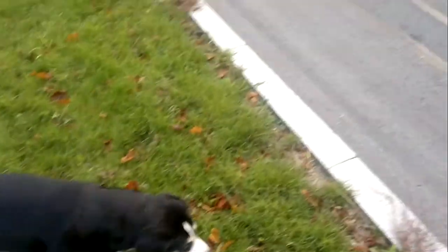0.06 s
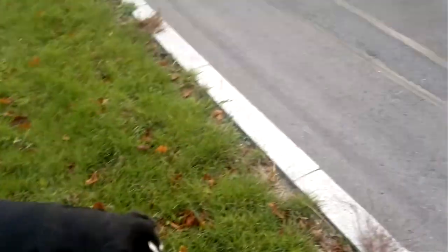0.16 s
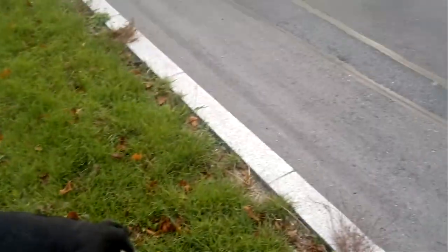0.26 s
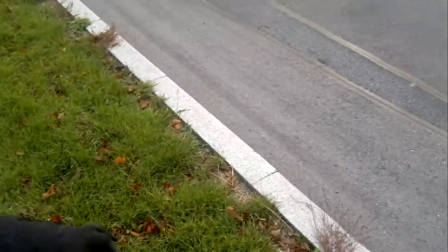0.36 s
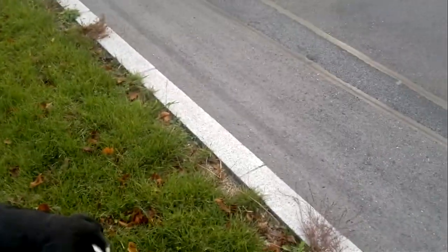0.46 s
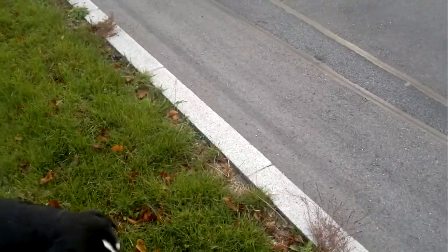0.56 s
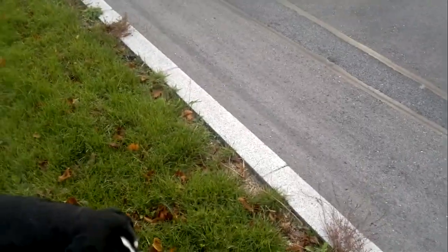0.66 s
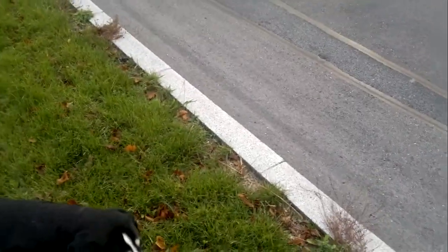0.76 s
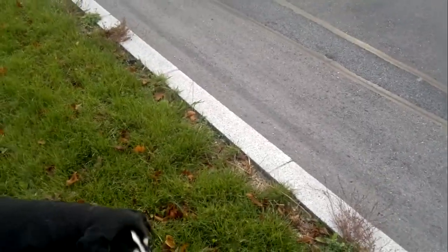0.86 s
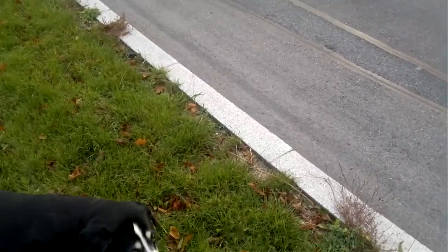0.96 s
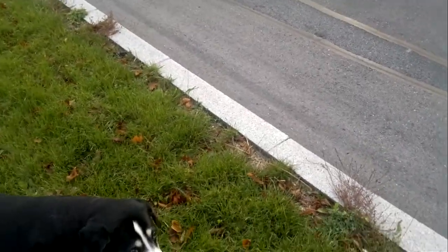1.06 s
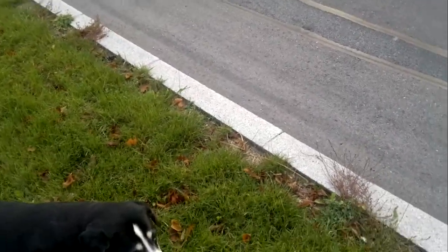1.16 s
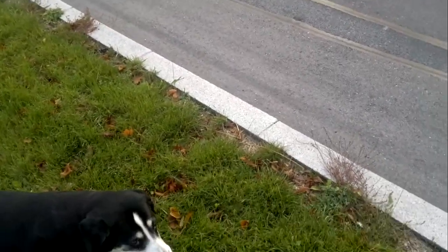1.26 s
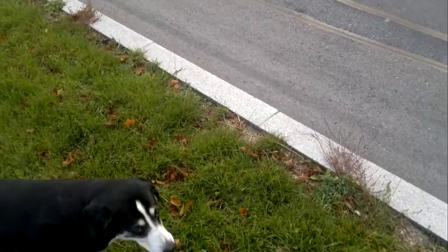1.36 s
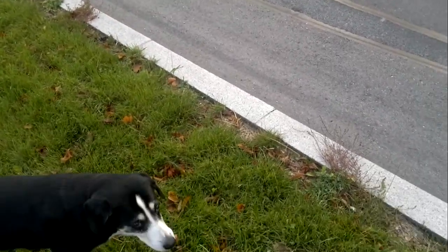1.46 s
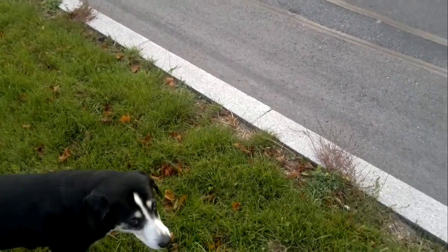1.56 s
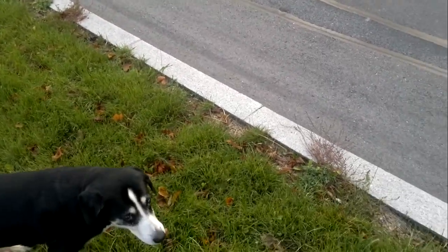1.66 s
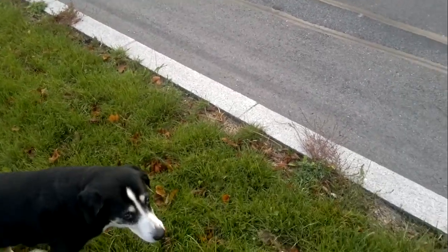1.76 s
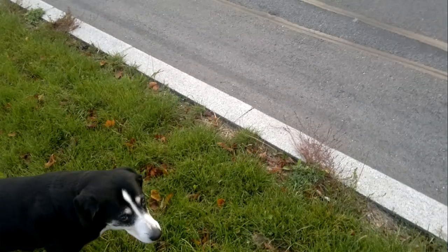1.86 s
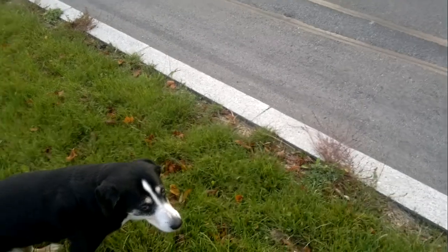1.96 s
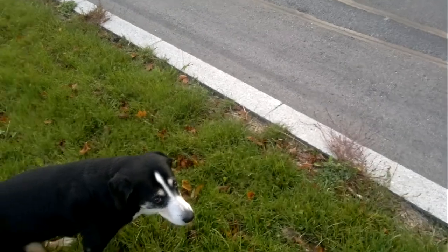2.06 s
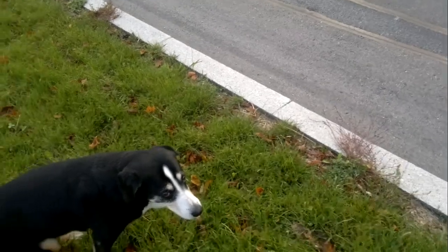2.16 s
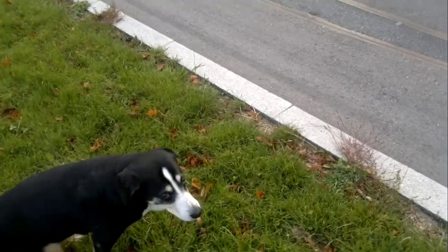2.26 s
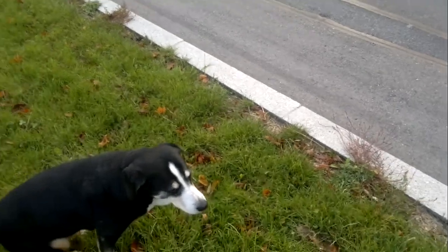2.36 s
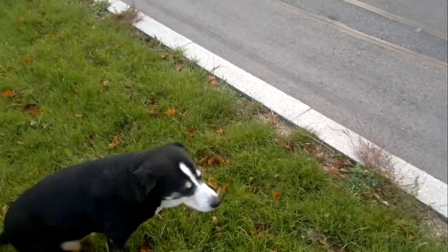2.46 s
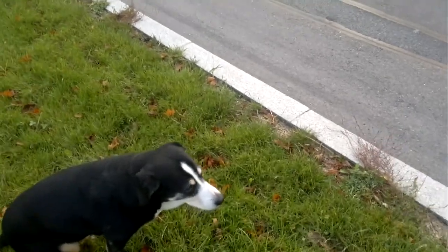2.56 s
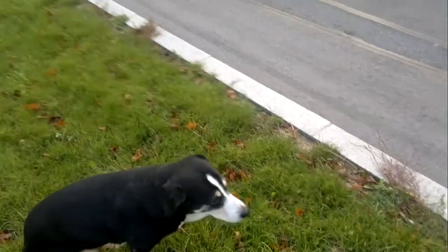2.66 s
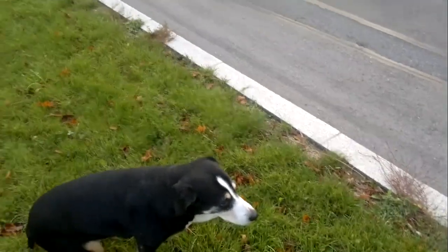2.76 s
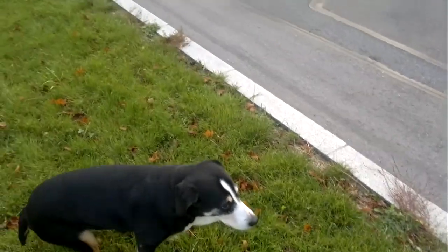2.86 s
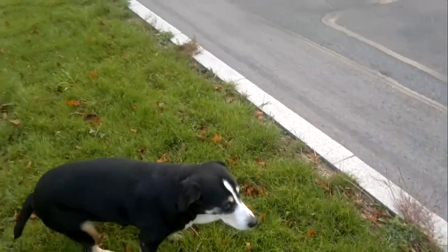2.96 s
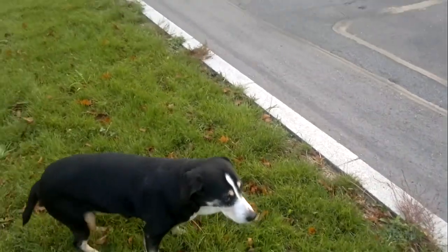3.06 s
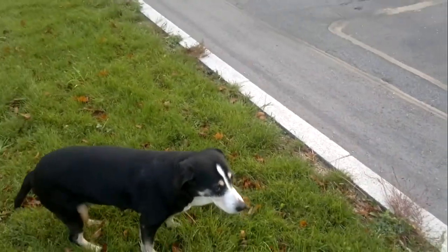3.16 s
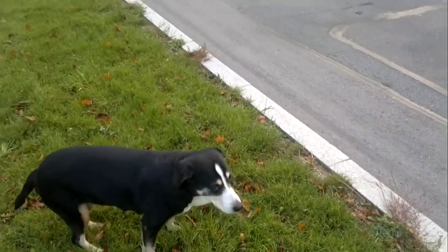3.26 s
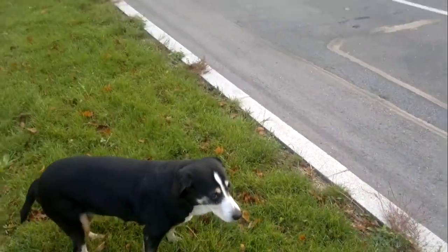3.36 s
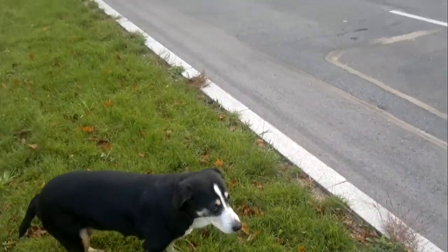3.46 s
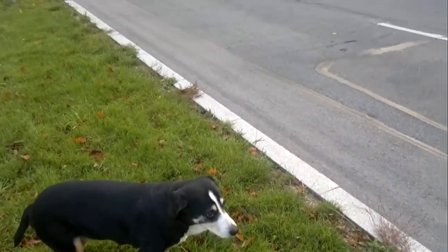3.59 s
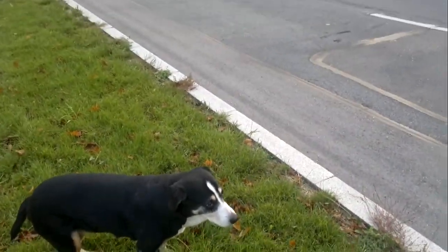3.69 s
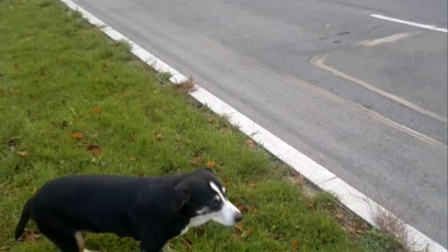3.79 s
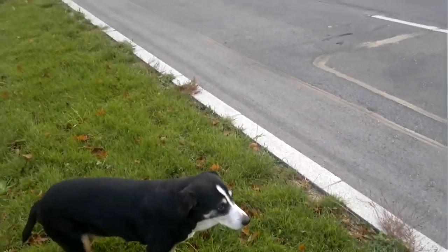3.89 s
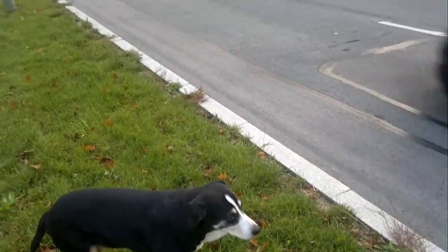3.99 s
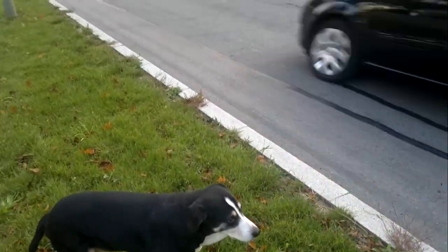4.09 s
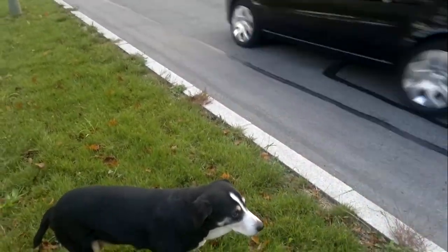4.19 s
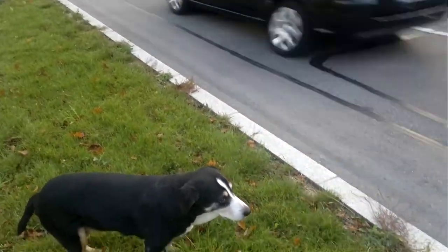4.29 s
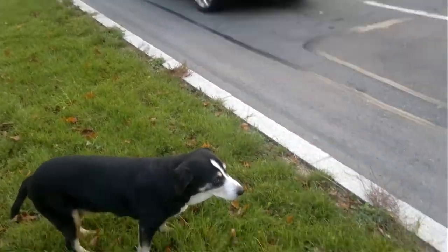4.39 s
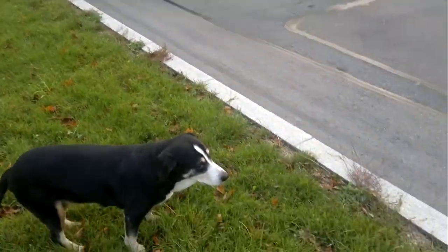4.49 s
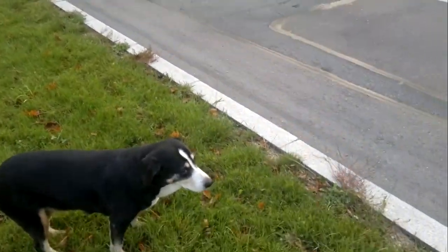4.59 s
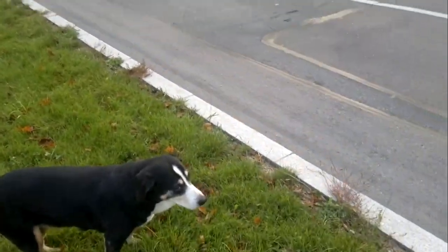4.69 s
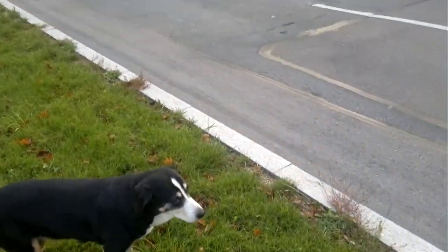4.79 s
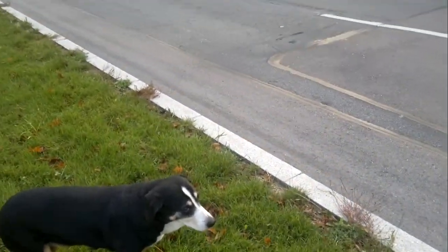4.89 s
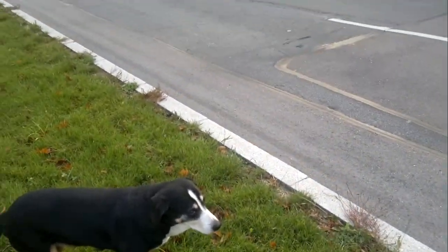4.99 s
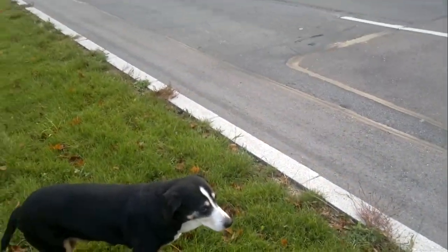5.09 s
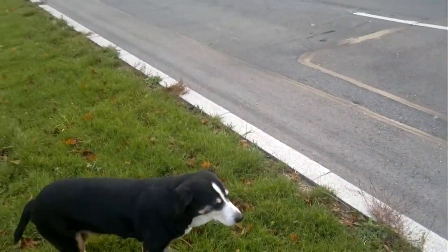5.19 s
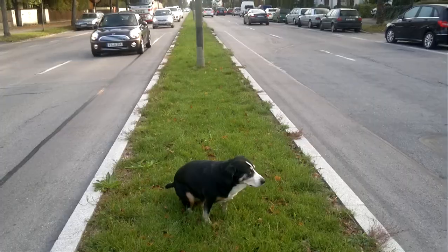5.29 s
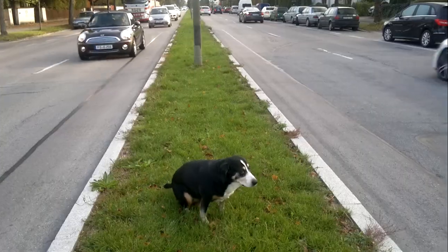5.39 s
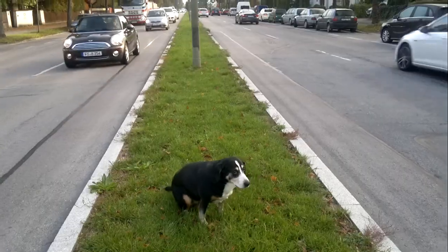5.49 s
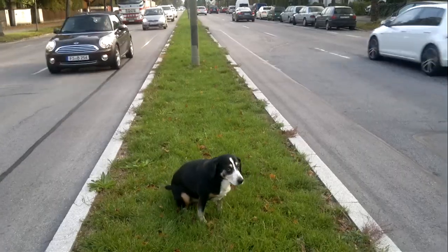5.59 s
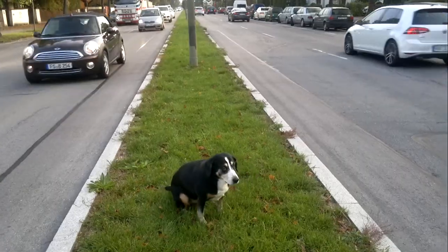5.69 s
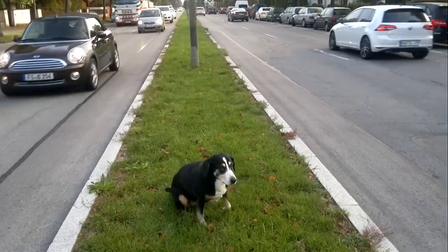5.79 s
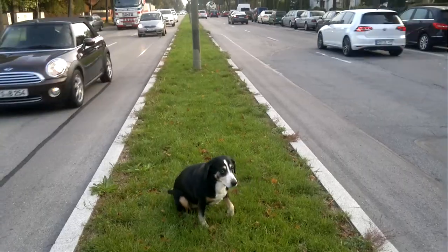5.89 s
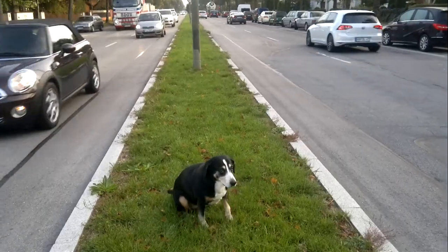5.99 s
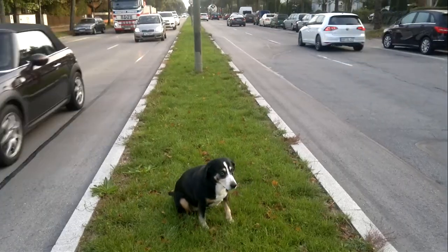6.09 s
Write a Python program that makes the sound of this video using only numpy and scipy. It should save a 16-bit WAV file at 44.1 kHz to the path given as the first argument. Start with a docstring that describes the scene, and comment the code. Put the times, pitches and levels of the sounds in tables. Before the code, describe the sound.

Muffled road hush with handling knocks swells into a close car pass, drops to silence for an instant, then returns abruptly with passing tyres and thuds.

```python
"""Multi-lane street traffic, heard from the grass strip through a hand-held camera with a half-covered right port.
Far traffic murmurs as banded noise from the start; soon skin rustles on the case and engine notes glide.
From about one second fingers bump (short bell-shaped pushes) and nails tick (ringing case modes).
Loud cars swell and pass around four seconds, as noise layers that follow each car's distance.
At 5.35 s the sound drops out for a fifth of a second; other cars then pass and thud over a road joint."""
import sys
import numpy as np
from scipy import signal
from scipy.fft import rfft, irfft, next_fast_len
from scipy.io import wavfile
from scipy.ndimage import uniform_filter1d, map_coordinates

SR = 44100
rng = np.random.default_rng(int(sys.argv[2]) if len(sys.argv) > 2 else 0)


def inscribe(sig):
    """Save sig as 16-bit PCM at rate SR to the path in sys.argv[1].

    A 1-D sig is mono; a 2-D sig holds one channel per row.
    Samples are clipped to [-1, 1] before scaling.
    """
    pcm = np.round(np.clip(np.atleast_2d(sig).T, -1, 1) * 32767)
    wavfile.write(sys.argv[1], SR, pcm.astype(np.int16))


def decibels_to_gain(level_db):
    """Convert a level in decibels to a linear amplitude gain (20 dB per decade)."""
    exponent = np.asarray(level_db, float) / 20
    return 10 ** exponent


N = 271151
OUT_S, IN_S = 5.3495, 5.572  # the sound drops out, and starts to fade back in [s]

# All source levels are set ahead of the final gain.
# noise colours of the tyre layers, low to high: (frequency [Hz], relative level [dB])
RUMBLE_COLOUR = [(15, -41.5), (25, -17), (40, 0), (80, -0.5), (100, -6), (130, -6.5), (217, -7.5),
                 (288, -10), (420, -18), (550, -16), (900, -86.5)]
DRONE_COLOUR = [(250, -35.5), (400, -5.5), (530, 6), (680, 1.5), (820, -2), (1100, -43)]
ROAR_COLOUR = [(450, -13), (760, -5.5), (900, 0.5), (1050, 1.5), (1250, 1), (1450, -3.5), (1700, -11),
               (2200, -56.5)]
PUMP_COLOUR = [(1100, -38), (1450, -1), (1700, 1), (2000, 2), (2250, -0.5), (2550, -7), (3200, -50)]
HISS_COLOUR = [(1400, -44.5), (2400, -14.5), (2600, -0.5), (3050, 2), (3600, -1), (4500, -13), (5400, -22),
               (5900, -45.5), (7000, -67.5)]
FIZZ_COLOUR = [(2900, -29), (3500, 1), (4200, -2.5), (5000, -9), (5800, -15.5), (6600, -26), (7400, -45)]
SIZZLE_COLOUR = [(4500, -27), (5600, 2), (6400, -5.5), (7400, -11), (8800, -16.5), (10800, -24.5),
                 (13000, -30.5), (15300, -30.5), (15900, -69)]
# single cars, the nearest given axle by axle:
# (closest [s], level [dB], approach [s], departure [s], lane loss before each layer's share [dB])
CAR_PASSES = [(-0.7458, -13, 0.46, .55, 0), (4.16, -.6, 0.47, 0.2, 0.69), (4.33, -4, .12, .2, 1.5),
              (4.97, -10, 0.25, 1.2, 2.5), (5.66, -1.5, .3, .2, 5), (6.02, -3.5, .25, .6, 6)]
# the 400-800 Hz drone of the passing cars:
# (closest [s], level [dB], approach [s], departure [s], lane loss before each layer's share [dB])
DRONE_PASSES = [(2.75, -10, 1.24, .5, 0), (3.85, 0.27, 0.563, 0.2, 0), (5.28, -4, .3, .5, 0),
                (5.62, -6, .3, .45, 0)]
# tyres in line of sight, which feed the two top layers:
# (closest [s], level [dB], approach [s], departure [s], lane loss before each layer's share [dB])
SEEN_PASSES = [(3.88, -11, .06, .1, -5), (4.08, -1, .16, 0.27, 0.5), (5.05, -11.5, 0.66, 1.2, 1.72),
               (5.6, -6.5, .3, 0.4, 7), (6.15, -11, .2, .3, 3)]
# rumble, drone, roar, pump, hiss, fizz, sizzle: (far traffic [dB], near car reference [dB],
# steepness of the fall with distance [dB per dB], lead ahead of the car [s], share of the lane loss [ratio])
LAYER_MIX = [(-35.5, -28.5, 2.06, 0.1, -1.132), (-55, -31, 1.925, -0.019, 0),
             (-40.5, -23, 1.308, 0.06, -0.251), (-39.5, -25.5, 1.536, 0.02, -0.3),
             (-44, -22, 2.333, 0.026, 1), (-78.5, -29.5, 4.2, -0.0081, .1), (-79.5, -44, 2.564, .02, 1.2)]
# colour of distant traffic: (frequency [Hz], level [dB])
FAR_COLOUR = [(330, 0), (450, -6), (620, -5), (850, -4.5), (1100, -3.5), (1450, -3), (2050, 0.7),
              (2600, -1), (3150, 2), (3600, -3.5), (4200, 2.39), (5000, 5), (5900, .5)]
# strongest ridge, drifting as the distant cars move: (time [s], frequency [Hz])
RIDGE_DRIFT = [(0, 1134), (.6, 1045), (1.05, 1240), (1.45, 1300), (1.85, 1160), (2.15, 1327), (2.6, 1220),
               (6.15, 1146)]
# near car heard once more off the road: (time [s], ridge spacing [Hz], depth before the roll-off [dB])
ROAD_BOUNCE = [(3.3, 1100, 0), (3.7, 1050, 1.5), (4.1, 1200, 2), (4.45, 1320, 3), (4.8, 1300, 1),
               (5.3, 900, 1), (5.58, 1030, 3), (6.15, 980, 3)]
# the hand slides on the right port: (time [s], bass loss [dB])
HAND_COVER = [(0, 32.5), (1.3, 28), (2.3, 21.5), (2.9, 17.5), (3.03, 14), (3.5, 14.5), (4.1, 11),
              (4.8, 16.5), (5.1, 11.5), (6.15, 11)]
# one column: (bass ends, middle begins, middle ends, treble begins [Hz])
COVER_SPLITS = [430, 1000, 2300, 3000]
# the loudest car moves along the street: (time [s], how late the left port hears it [ms])
PORT_LAG = [(0, 0.055), (1.3, -0.153), (1.6, 0.22), (3.6, 0.21), (4.1, 0.272), (4.6, -0.307),
            (5.35, 0.0085), (5.6, -0.184), (6.15, -0.16)]
# (frequency [Hz], likeness of the left and right street sound [0 to 1])
PORT_LIKENESS = [(60, .95), (350, .94), (700, .92), (1100, .75), (2000, .72), (3000, .45), (4500, .15)]
# treble band coming and going in the right port: (time [s], from [Hz], to [Hz], loss [dB])
TREBLE_OPENING = [(0, 2400, 5300, 47), (3.3, 2400, 5290, 39.5), (3.47, 2500, 5196, 18),
                  (3.6, 2450, 5390, 12.5), (3.92, 2450, 5500, 15), (3.98, 2300, 7960, 20),
                  (4.15, 2300, 8000, 21.5), (4.3, 2300, 8000, 18.5), (4.38, 3400, 5400, 16),
                  (4.55, 3600, 4570, 12.5), (4.76, 3600, 4300, 34), (4.83, 2500, 4480, 25.5),
                  (5.1, 2400, 4610, 20), (5.2, 2400, 5400, 20.5), (5.35, 2400, 5400, 15),
                  (5.6, 2400, 5400, 21), (6.15, 2400, 5520, 16.5)]
# skin brushing the case: (time [s], level before grain [dB], half-width of the stroke [s])
SKIN_BRUSHES = [(0.265, -78, 0.042), (2.069, -74.5, 0.22), (2.347, -67.5, 0.0285), (2.528, -71, 0.0395),
                (2.791, -73.5, 0.038), (2.988, -63.5, 0.0205), (3.031, -68, 0.0153)]
# colour of skin on plastic: (frequency [Hz], relative level [dB])
SKIN_COLOUR = [(3000, -28.5), (5000, -2.5), (8000, -8), (12000, -12.5), (13500, -33)]
# (start [s], length [s], first pitch [Hz], last pitch [Hz], level before overtone balance [dB])
ENGINE_NOTES = [(.5, .55, 270, 240, -40), (2.75, 0.7416, 243.5, 239, -33.5), (4.4, 1.1, 232, 205, -36.5),
                (3.25, 1.2, 77, 73.5, -30.5), (4.55, 0.84, 84, 99, -34), (4.99, 0.45, 90, 75, -23.5),
                (4.08, .22, 215, 206, -24.5), (5.52, .65, 80, 70, -23), (5.52, .7, 200, 188, -28.5),
                (5.55, .65, 310, 295, -33)]
# balance within an engine note: (multiple of the pitch, level [dB])
ENGINE_OVERTONES = [(1, -4.5), (2, -12.5), (3, -23)]
# finger bumps on the case: (time [s], level [dB], frequency [Hz], length [cycles], push +1 or pull -1)
FINGER_BUMPS = [(1.135, -27.5, 203.6, 4.3, 1), (1.788, -23.5, 150, 0.61, 1), (2.3275, -11, 109.7, 1.24, 1),
                (2.3384, -13, 220, 0.756, 1), (2.345, -8, 117.8, 1.2, -1), (2.3508, -17, 299, 0.91, 1),
                (2.38, -25, 70, 3.5, 1), (2.409, -16, 115, 0.72, -1), (2.4138, -19, 130, 0.65, 1),
                (2.507, -19, 219, 0.92, 1), (2.516, -21.5, 111, 1.15, 1), (2.587, -12.5, 130, 0.825, -1),
                (2.592, -21.5, 110, 0.68, 1), (2.6326, -15, 600, 0.68, 1), (2.6345, -16.5, 250, .8, -1),
                (2.6447, -21, 69.7, 1.26, 1), (2.862, -21, 90, 1.34, 1), (3.273, -21.5, 120, 0.63, -1),
                (3.376, -24, 90, 0.99, 1)]
# fingernail ticks: (time [s], level [dB], sharpness added above 6 kHz [dB],
# edge added above 4.2 and up to 6 kHz [dB], body added below 2.5 kHz [dB])
NAIL_TICKS = [(2.3206, -32, -12.5, 0, 3), (2.3406, -29, -3.5, 0, 4), (2.3486, -26, -5.5, 0, 2),
              (2.6307, -14.5, 6, -5, 3), (2.9834, -27, 8, -1, 0), (3.0265, -25, 3, 4, -3),
              (3.1167, -19, -14, 2, 4), (3.3916, -24, -5, 1, -1.5), (5.7462, -24, -12, 5, 0)]
# ringing modes of the plastic case: (frequency [Hz], level before tick colour [dB], 60 dB decay [s])
CASE_MODES = [(1500, -6, 0.005), (2100, -6, 0.004), (3050, 3.5, 0.0045), (3700, -5, 0.0035),
              (4680, -2.5, 0.0035), (5500, -12, .003), (6900, -26, 0.003), (8600, -31, .003),
              (10300, -30, 0.003), (11700, -33, .003), (13500, -42, .003)]
# suspensions over a road joint: (time [s], level [dB], frequency [Hz], length [cycles], push +1 or pull -1)
JOINT_THUDS = [(5.609, -11, 80, .8, -1), (5.667, -11, 1100, 2.2, 1), (5.69, -12, 90, .8, -1),
               (5.826, -14, 90, .8, -1), (5.832, -15, 90, .8, 1)]


def unit(x):
    """Scaled to rms 1."""
    return x / np.sqrt(np.mean(x ** 2) + 1e-20)


def along(points, hz):
    """(Hz, value) points read on a log frequency axis."""
    f, v = np.transpose(points)
    return np.interp(np.log(hz + 1), np.log(f + 1), v)


def curves(rows, t=np.arange(N) / SR):
    """Each column after the time, read at times t."""
    s, *cols = np.transpose(rows)
    return [np.interp(t, s, c) for c in cols]


def wobble(rate):
    """A smooth random curve with rate knots a second."""
    knots = rng.standard_normal(int(N * rate / SR) + 4)
    return map_coordinates(knots, [np.arange(N) * rate / SR])


def rush(spectrum, patchy_db):
    """Two unrelated coloured noises, jointly of rms 1, sharing time-frequency patches of random gain."""
    z = signal.stft(rng.standard_normal((2, N)), nperseg=1024)[2]
    field = rng.standard_normal(z.shape[1:])
    field = uniform_filter1d(uniform_filter1d(field, size=8, axis=0), size=8, axis=1)
    patchy = signal.istft(z * decibels_to_gain(patchy_db * unit(field)), nperseg=1024)[1]
    size = next_fast_len(N + SR)
    hz = np.fft.rfftfreq(size, 1 / SR)
    inside = (hz > spectrum[0][0]) * (hz < spectrum[-1][0])
    colour = decibels_to_gain(along(spectrum, hz)) * inside
    return unit(irfft(rfft(patchy, size) * colour, size)[:, :N])


def passing(cars, far_db, near_db, steep, ahead_s, lane_share):
    """Layer gain: far traffic plus cars fading with distance, each kept to its side of the drop-out's end."""
    t = np.arange(N) / SR
    power = decibels_to_gain(2 * far_db)
    for s, db, come_s, go_s, lane_db in cars:
        u = t - s + ahead_s
        distance_db = 10 * np.log10(1 + (u / np.where(u < 0, come_s, go_s)) ** 2)
        level_db = near_db + db - lane_share * lane_db - steep * distance_db
        same_side = (t < IN_S) == (s < IN_S)
        power = power + same_side * decibels_to_gain(2 * level_db)
    return np.sqrt(power)


def tyres():
    """Exhausts rumble; treads drone, roar in the horn between tyre and road, pump air, hiss, fizz and sizzle."""
    fleets = [CAR_PASSES, DRONE_PASSES, CAR_PASSES, CAR_PASSES, CAR_PASSES, SEEN_PASSES, SEEN_PASSES]
    gains = [passing(cars, *row) for cars, row in zip(fleets, LAYER_MIX)]
    rumble, drone, roar, pump, hiss, fizz, sizzle = gains
    flutter = wobble(9)  # uneven asphalt shakes the five bands from drone to fizz together
    rumble = rumble * decibels_to_gain(0.37 * wobble(13) + 0.9 * wobble(2.8)) * rush(RUMBLE_COLOUR, patchy_db=1.5)
    drone = drone * decibels_to_gain(0.6 * flutter + wobble(3)) * rush(DRONE_COLOUR, patchy_db=1.5)
    roar = roar * decibels_to_gain(0.33 * flutter + 0.65 * wobble(3.092)) * rush(ROAR_COLOUR, patchy_db=1.06)
    pump = pump * decibels_to_gain(0.17 * flutter) * rush(PUMP_COLOUR, patchy_db=0.88)
    hiss = hiss * decibels_to_gain(0.35 * flutter) * rush(HISS_COLOUR, patchy_db=1.29)
    fizz = fizz * decibels_to_gain(0.44 * flutter) * rush(FIZZ_COLOUR, patchy_db=1.64)
    sizzle = sizzle * decibels_to_gain(wobble(12)) * rush(SIZZLE_COLOUR, patchy_db=1.5)
    return rumble + drone + roar + pump + hiss + fizz + sizzle


def road_reflection(x):
    """Reflection carves a fixed colour with a drifting ridge into far traffic, a moving comb into near cars."""
    roar_row = LAYER_MIX[2]
    far_share = (decibels_to_gain(roar_row[0]) / passing(CAR_PASSES, *roar_row)) ** 2.23
    hz, t, z = signal.stft(x, SR, nperseg=1024)
    hz = hz[:, None]
    octaves_off = np.log2((hz + 1) / curves(RIDGE_DRIFT, t)[0])
    ridge_db = 6.5 * np.exp(-(octaves_off / 0.16) ** 2)
    far_db = along(FAR_COLOUR, hz) + ridge_db
    spacing_hz, depth_db = curves(ROAD_BOUNCE, t)
    smooth_road = np.exp(-(hz / 2300) ** 4)  # the rough road scatters what is higher
    reach = smooth_road * np.clip(2 * hz / spacing_hz - 0.5, 0, 1)
    comb_db = depth_db * reach * np.cos(2 * np.pi * hz / spacing_hz)
    far, near = [signal.istft(z * decibels_to_gain(db), SR, nperseg=1024)[1][:, :N] for db in (far_db, comb_db)]
    return far_share * far + (1 - far_share) * near


def covered_port(street, other):
    """The hand's gaps pass part of the street, shifted in time; treble is shut but for a moving band."""
    middle_fixed_db, middle_share, shade = 11, 0.33, 0.3  # shade: middle dB lost per dB of excess treble
    shut_db, near_db = 45.5, -37  # treble loss outside the band; street treble where shading begins
    edge_hz = 160  # softness of the band's edges
    bass_top, middle_low, middle_top, treble_low = COVER_SPLITS
    hz, t, (same, new) = signal.stft([street, other], SR, nperseg=512)
    alike = np.clip(along(PORT_LIKENESS, hz), 0, 1)[:, None]
    early = np.exp(2j * np.pi * hz[:, None] * curves(PORT_LAG, t)[0] / 1000)

    treble = np.sum(abs(same[hz > middle_top]) ** 2, axis=0)
    over_db = 10 * np.log10(abs(uniform_filter1d(treble, size=25))) - near_db
    bass_db, = curves(HAND_COVER, t)
    middle_db = middle_fixed_db + middle_share * bass_db + shade * np.maximum(over_db, 0)
    into_middle = along([(bass_top, 0), (middle_low, 1)], hz)[:, None]
    into_treble = along([(middle_top, 0), (treble_low, 1)], hz)[:, None]
    loss_db = bass_db + into_middle * (middle_db - bass_db) + into_treble * (shut_db - middle_db)

    from_hz, to_hz, band_db = curves(TREBLE_OPENING, t)
    above = (1 + np.tanh((hz[:, None] - from_hz) / edge_hz)) / 2
    below = (1 + np.tanh((to_hz - hz[:, None]) / edge_hz)) / 2
    gain = np.maximum(decibels_to_gain(-loss_db), above * below * decibels_to_gain(-band_db))
    heard = (alike * early * same + np.sqrt(1 - alike ** 2) * new) * gain
    return signal.istft(heard, SR, nperseg=512)[1][:N]


def self_noise():
    """Steady microphone noise, softer in the treble and 5 dB lower in the right port."""
    return decibels_to_gain([[-79], [-84]]) * rush([(100, 0), (5000, -6), (15500, -16)], patchy_db=0)


def brushing():
    """Short grainy rustles of skin sliding on plastic, as bell-shaped bursts of fluttering noise."""
    t = np.arange(N) / SR
    stroke = sum(decibels_to_gain(db) * np.exp(-((t - s) / width_s) ** 2) for s, db, width_s in SKIN_BRUSHES)
    grain = decibels_to_gain(4 * wobble(310))
    return stroke * grain * rush(SKIN_COLOUR, patchy_db=1)[0]


def engines():
    """Each car's firing note and overtones, gliding in pitch, slightly unsteady in pitch and strength."""
    swell_s, fade_s = 0.084, 0.13
    hum, t = np.zeros(N), np.arange(N) / SR
    for s, length, first_hz, last_hz, db in ENGINE_NOTES:
        hz = np.interp(t, [s, s + length], [first_hz, last_hz])
        phase = 2 * np.pi * np.cumsum(hz * (1 + 0.006 * wobble(8))) / SR
        envelope = np.clip(np.minimum((t - s) / swell_s, (s + length - t) / fade_s), 0, 1)
        same_side = (t < IN_S) == (s + length / 2 < IN_S)  # kept to its side of the drop-out's end
        level_db = db + 1.5 * wobble(10)
        note = sum(decibels_to_gain(level_db + tone_db) * np.sin(k * phase) for k, tone_db in ENGINE_OVERTONES)
        hum += envelope * same_side * note
    return hum


def pushes(rows):
    """Each row moves the air for a few cycles at most: a cosine under a bell."""
    out, t = np.zeros(N), np.arange(-SR // 20, SR // 20) / SR
    for s, db, hz, cycles, sign in rows:
        bell = np.exp(-(2 * hz * t / cycles) ** 2)
        out[round(s * SR) - SR // 20:][:len(t)] += np.sign(sign) * decibels_to_gain(db) * bell * np.cos(2 * np.pi * hz * t)
    return out


def fingers():
    """Bumps push the left membrane for a few cycles at most; nail ticks ring the case for a few ms."""
    out = pushes(FINGER_BUMPS)
    t = np.arange(-SR // 500, SR // 50) / SR
    landing = (1 + np.tanh(t / 0.00025)) / 2  # the nail lands within a fraction of a ms
    for s, db, sharp_db, edge_db, body_db in NAIL_TICKS:
        ring = np.zeros(len(t))
        for hz, mode_db, t60 in CASE_MODES:
            colour_db = sharp_db * (hz > 6000) + edge_db * (4200 < hz <= 6000) + body_db * (hz < 2500)
            ring += decibels_to_gain(mode_db + colour_db - 60 * t / t60) * np.cos(2 * np.pi * hz * t)
        out[round((s + t[0]) * SR):][:len(t)] += decibels_to_gain(db) * landing * ring
    return out


def joint_thuds():
    """Suspensions thud over a road joint, each a short push of air."""
    return pushes(JOINT_THUDS)


def drop_out():
    """Gain that drops by 26 dB for about 22 ms, then is silent, then fades back in."""
    t = np.arange(N) / SR
    lowered = decibels_to_gain(-26) * np.exp(-((t - OUT_S) / 0.0217) ** 8) * (t > OUT_S)
    fade_in = np.clip((t - IN_S) / 0.0201, 0, 1)
    return (t <= OUT_S) + lowered + fade_in


def scene():
    """Street in both ports; handling in the left, with a very faint leak to the right."""
    left_only = [[1], [0]]
    street, other = road_reflection(tyres()) + (engines() + joint_thuds()) * left_only
    hand = fingers() + brushing()
    return np.array([street + hand, covered_port(street, other) + decibels_to_gain(-58) * hand])


def band_limit(x):
    """A steep low-pass at the top of the band."""
    return signal.sosfilt(signal.butter(12, 15700, fs=SR, output="sos"), x)


def record(dry):
    """Adds microphone self-noise, then the final gain, soft clipping and the drop-out."""
    x = decibels_to_gain(5.5) * (dry + self_noise())
    x = x / (1 + abs(x) ** 6) ** (1 / 6)
    mix = x * drop_out()
    return band_limit(mix)


dry = scene()
out = record(dry)
inscribe(out)
```